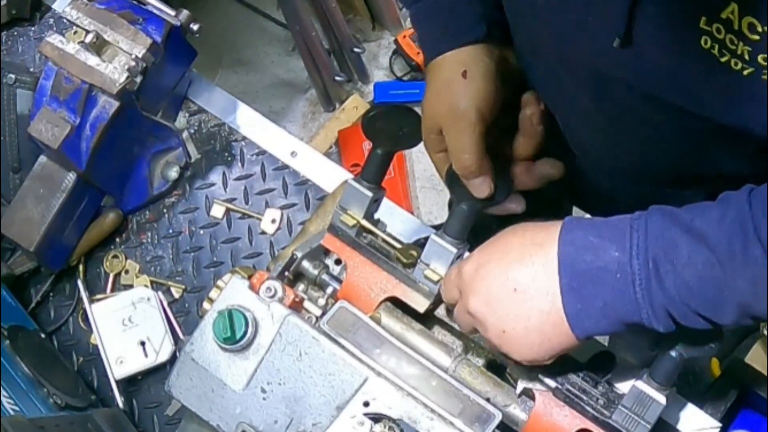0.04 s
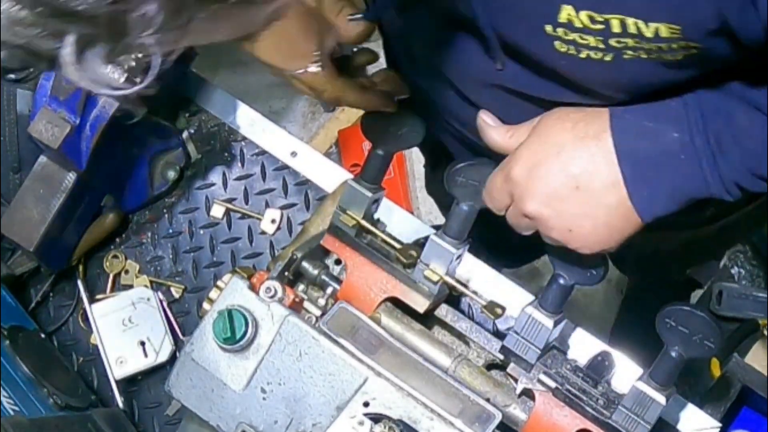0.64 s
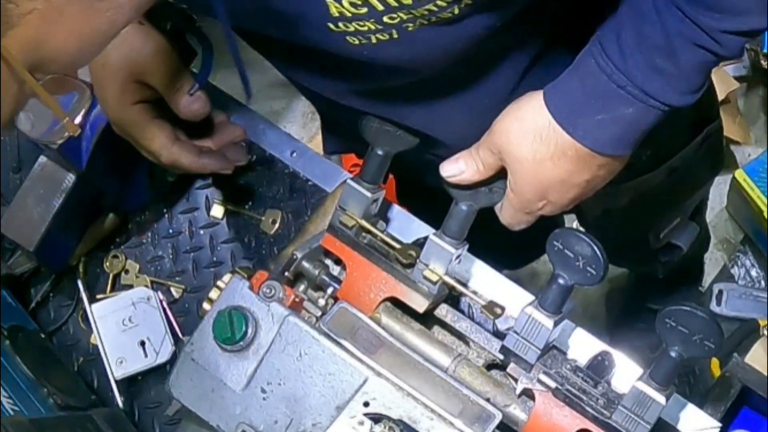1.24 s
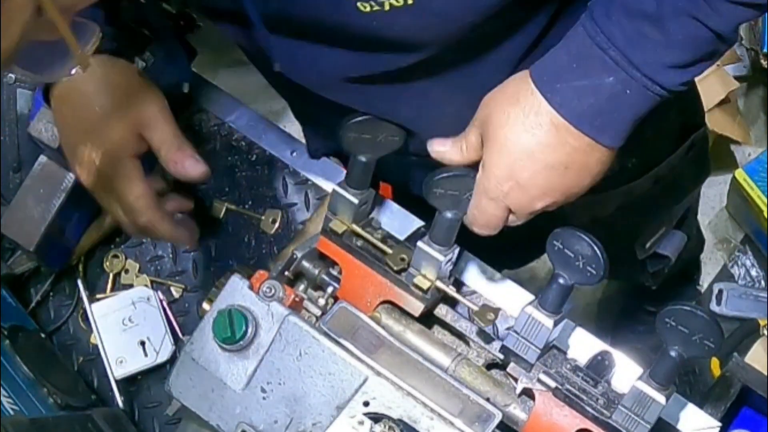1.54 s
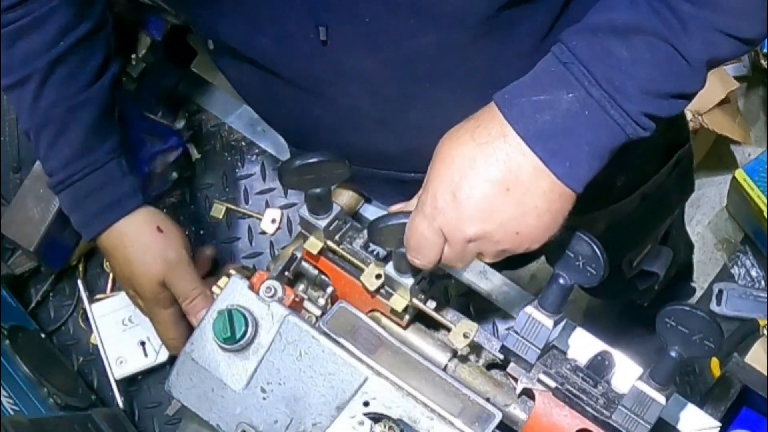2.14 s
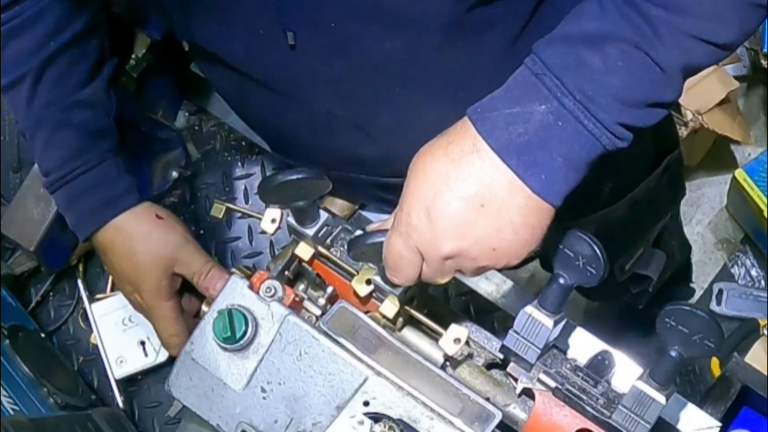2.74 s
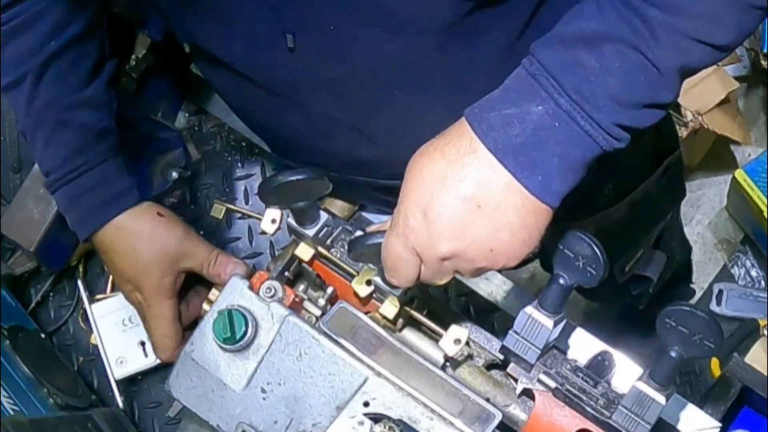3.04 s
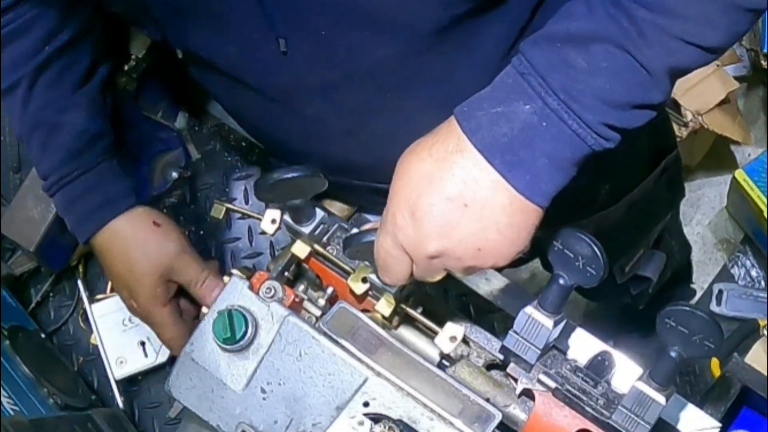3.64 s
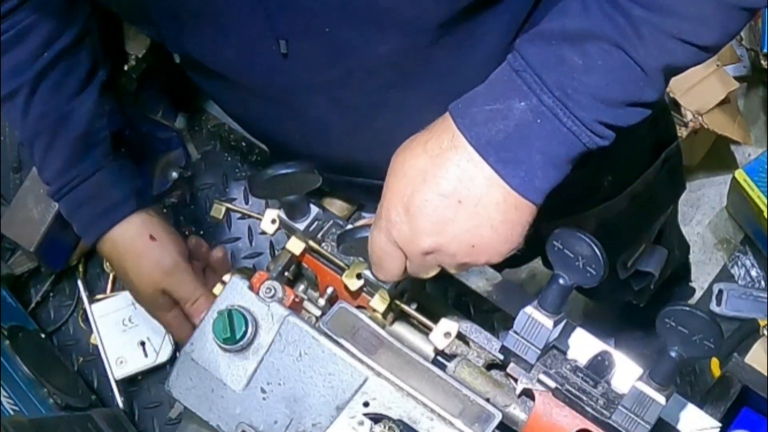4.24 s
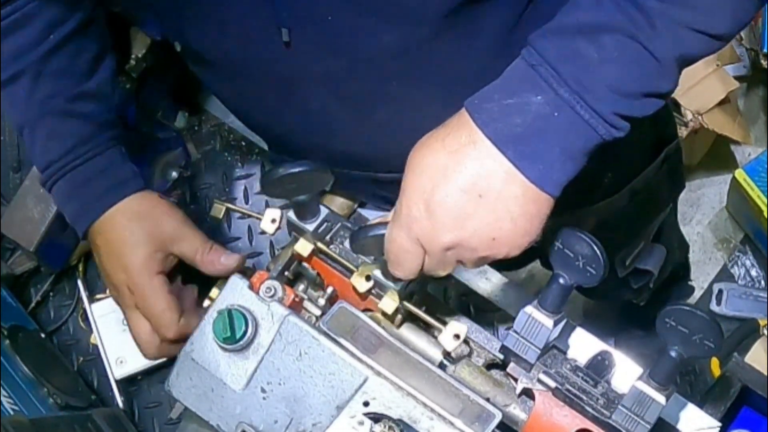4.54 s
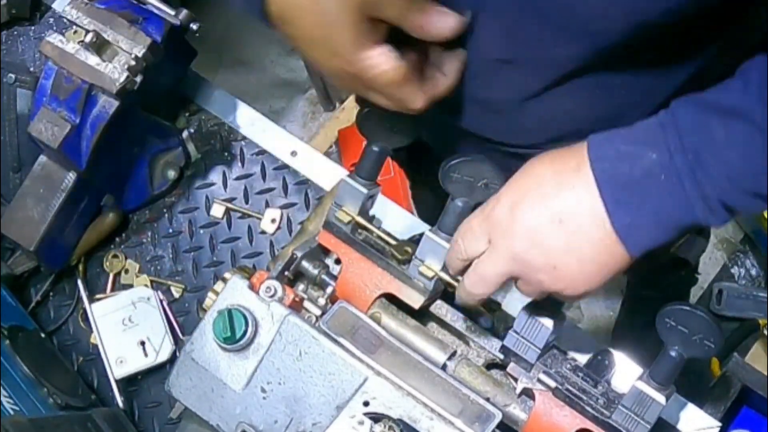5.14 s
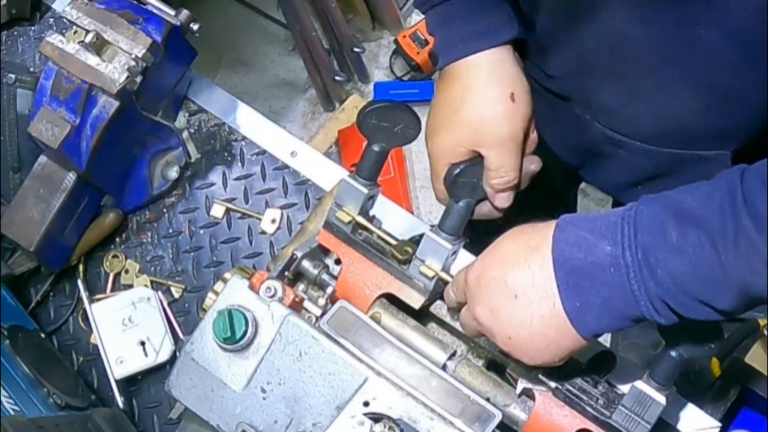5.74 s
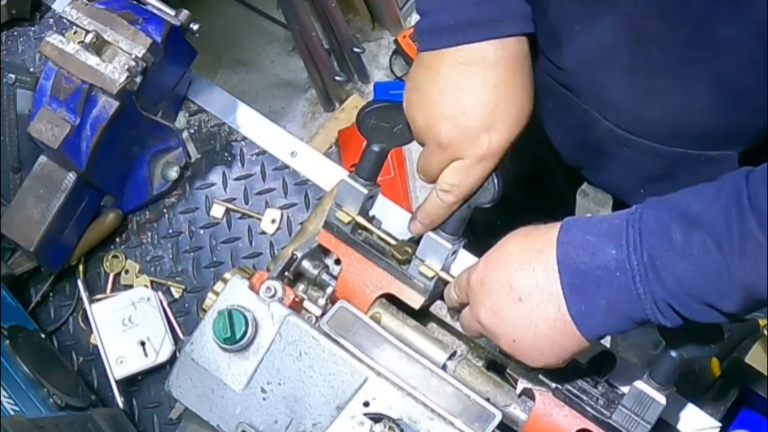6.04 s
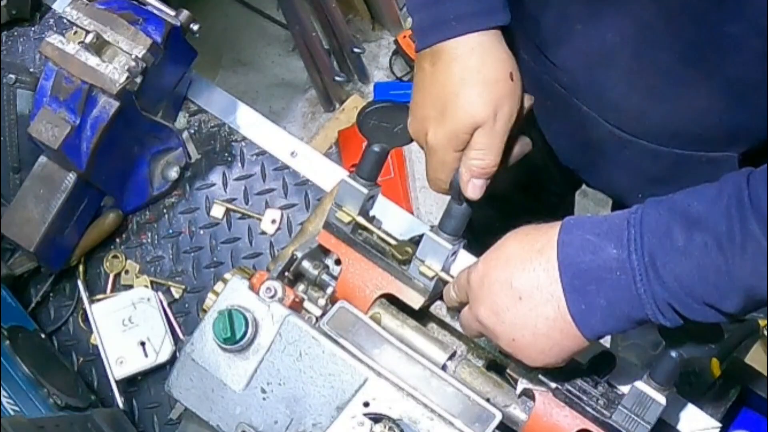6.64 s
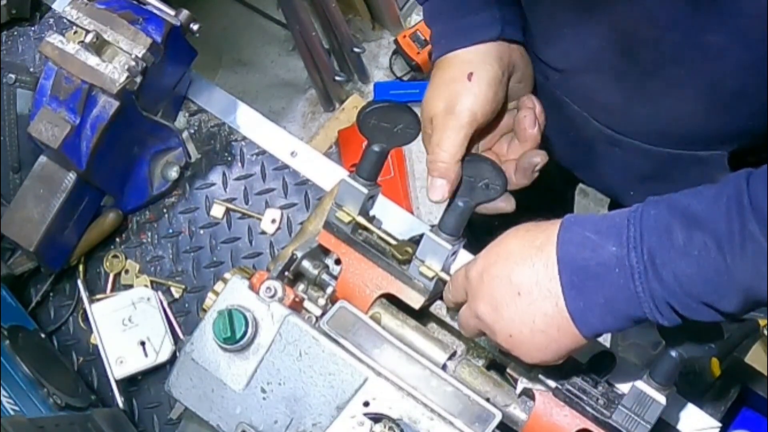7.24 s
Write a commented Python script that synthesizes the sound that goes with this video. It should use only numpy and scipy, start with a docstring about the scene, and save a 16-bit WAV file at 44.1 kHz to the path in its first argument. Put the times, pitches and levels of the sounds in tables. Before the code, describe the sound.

The electric motor of a key-cutting machine hums and throbs steadily while its carriage is shifted with faint knocks and light ticks.

```python
"""A key-cutting machine idles close by. Its motor throbs and hums, and drives the frame, the housing
and a loose panel into forced vibration. The cutter spindle rings faintly; the bearings hiss, whistle
and rub once every turn, over cooling air and workshop rumble. Hands shift the key carriage, whose
impacts give a few dull knocks and light ticks; the hum sinks while they press."""
import sys
import numpy as np
from scipy.fft import rfft, irfft, next_fast_len
from scipy.io import wavfile
from scipy.ndimage import map_coordinates

SR = 44100
rng = np.random.default_rng(int(sys.argv[2]) if len(sys.argv) > 2 else 0)


def inscribe(sig):
    """Save sig as 16-bit PCM at rate SR to the path in sys.argv[1].

    A 1-D sig is mono; a 2-D sig holds one channel per row.
    Samples are clipped to [-1, 1] before scaling.
    """
    pcm = np.round(np.clip(np.atleast_2d(sig).T, -1, 1) * 32767)
    wavfile.write(sys.argv[1], SR, pcm.astype(np.int16))


N = 321489

SHAFT_HZ, THROB_HZ = 24.897, 25.002
SWELL_S = 0.22  # time for a resonance to build up or die down
# resonances of the cast frame: f/Hz, width/Hz, level/dB
FRAME_MODES = [(163.2, 24.6, 1), (198.8, 39.5, 2), (258.5, 19, -5), (281.5, 41, -1), (348.5, 113, -10.5),
               (412, 58, -11.5)]
# resonances of the sheet-metal housing: f/Hz, width/Hz, level/dB
HOUSING_MODES = [(507, 56, 1), (647, 220, -8.5), (758, 340, -3.5), (1326, 128, -2), (1430, 225, -5.5),
                 (1657, 177, -8)]


def amp(db):
    """Amplitude ratio of a level in decibels."""
    return 10 ** (np.asarray(db) / 20)


def unit(x):
    """Normalisation to rms 1."""
    return x / np.sqrt(np.mean(x ** 2) + 1e-20)


def clock():
    """Uniform sampling: t/s of each sample."""
    return np.arange(N) / SR


def wobble(rate):
    """Slow random modulation: a spline through `rate` knots a second."""
    t = np.linspace(0, N / SR, num=4000)
    curve = map_coordinates(rng.standard_normal(size=400), [t * rate], mode="wrap")
    return np.interp(clock(), t, curve)


def spells(rows, rise=SWELL_S, fall=SWELL_S):
    """Trapezoidal envelopes, summed over rows of t/s, length/s, height."""
    t = clock()
    return sum(height * np.clip((t - start) / rise, 0, 1) * np.clip(1 - (t - start - length) / fall, 0, 1)
               for start, length, height in rows)


def filtered(x, response):
    """Linear filtering: the spectrum of x times a frequency response."""
    size = next_fast_len(N + SR // 4)
    return irfft(rfft(x, size) * response(np.fft.rfftfreq(size, 1 / SR)), size)[:N]


def rush(spectrum):
    """Coloured noise, rms 1, from rows of f/Hz, level/dB."""
    hz, db = np.transpose(spectrum)
    noise = rng.standard_normal(N)
    return unit(filtered(noise, lambda f: amp(np.interp(np.log(f + 1), np.log(hz), db))))


def shaft_comb(hz, repeat):
    """Comb filtering: surfaces that meet again each turn favour the shaft's harmonics."""
    return (1 + repeat ** 2 - 2 * repeat * np.cos(2 * np.pi * hz / SHAFT_HZ)) ** -.5


def shaken(modes, repeat=0):
    """Forced vibration, rms 1: noise through a body's steep-sided resonances."""
    def response(f):
        power = sum(amp(db) ** 2 / (1 + ((f * f - hz * hz) / (f * width + 1e-6)) ** 2) ** 2
                    for hz, width, db in modes)
        return np.sqrt(power) * shaft_comb(f, repeat)
    return unit(filtered(rng.standard_normal(N), response))


def tone(hz, waver):
    """Phase modulation: a sine of rms 1 that strays by about `waver` radians."""
    return np.sqrt(2) * np.sin(2 * np.pi * (hz * clock() + rng.random()) + waver * wobble(7))


def throb(order, lag=0.368):
    """One Fourier component of the motor's pulse, rms 1, delayed by `lag` throb cycles."""
    return np.sqrt(2) * np.sin(2 * np.pi * order * (lag - THROB_HZ * clock()))


def rolling(turn, noise, repeat):
    """Periodic roughness: a share `repeat` of the noise power recurs with every turn."""
    surface = map_coordinates(noise, [SR + (turn % 1) * (SR / SHAFT_HZ)])
    return np.sqrt(repeat) * unit(surface) + np.sqrt(1 - repeat) * noise


def around(turn, place):
    """Angular distance from a place on the shaft, in turns."""
    return abs((turn - place + .5) % 1 - .5)


def singing(modes):
    """Frequency locking, rms 1: each mode wavers on the nearest harmonic of the shaft."""
    return unit(sum(amp(db + 3.2 * wobble(2.2)) * tone(round(hz / SHAFT_HZ) * SHAFT_HZ, waver=0.9)
                    for hz, db in modes))


def struck(vibration, start, t60, rise_share):
    """Damped response to a contact, about rms 1 at its peak; the rise takes a share of t60."""
    age = np.arange(SR // 2) / SR
    shape = (1 - np.exp(-age / (rise_share * t60))) * np.exp(-np.log(1000) * age / t60)
    envelope = np.pad(shape / shape.max(), (round(start * SR), N))[:N]
    burst = vibration * envelope
    return burst * np.linalg.norm(envelope) / (np.linalg.norm(burst) + 1e-20)


def motor_hum():
    """Harmonic series on half the mains frequency; a pressing hand damps the hum and its octave."""
    # low hum: multiple of the throb, rms level/dB
    harmonics = [(2, -41), (3, -34), (5, -46), (6, -56.5), (7, -55), (9, -53), (12, -54.5)]
    # a hand bears on the machine: t/s, length/s, depth/dB
    presses = [(0, 0.26, 1.5), (1.5, 3.1, 0.5), (2.1, .85, 1.5), (2.9, 1.68, 6.5), (5.82, 0.1, 6),
               (6.55, 0.31, 5.5), (7.02, .3, 5)]
    # the hum's octave sinks: t/s, length/s, depth/dB
    octave_dips = [(.6, 0.91, 0), (1.45, 0.27, 5), (3.0, 1.55, 4)]
    press_s, release_s, mains_lag = 0.082, 0.15, 0.3367
    rocking = amp(-20) * throb(order=1, lag=0.678)
    low = sum(amp(db) * throb(order) for order, db in harmonics)
    mains_hum = amp(-28 - spells(presses, press_s, release_s)) * throb(order=4, lag=mains_lag)
    octave = amp(-35.5 - spells(octave_dips, press_s, release_s)) * throb(order=8, lag=mains_lag)
    return rocking + low + mains_hum + octave


def gear_whine():
    """Line spectrum of the running gear, lightly modulated in amplitude and phase."""
    # thin steady tones: f/Hz, rms level/dB
    partials = [(293.7, -44), (423.3, -56.5), (473.6, -60.5), (573.1, -61), (624.5, -68.5), (673.5, -62.5),
                (924.9, -70.5), (1100.1, -62.5), (1124.3, -68), (1421.4, -69), (2340.6, -75), (4107, -79)]
    return sum(amp(db + 1.72 * wobble(5)) * tone(hz, waver=0.61) for hz, db in partials)


def casing_rumble():
    """Forced vibration: the motor makes the frame rumble and the housing rattle."""
    # the rumble shifts in level: t/s, length/s, change/dB
    shifts = [(0, 0.49, -1), (5.5, 1.5, 0)]
    frame = amp(-37.5 + spells(shifts) + 1.6 * wobble(17)) * shaken(FRAME_MODES, repeat=0.1)
    housing = amp(-49.5 + 0.49 * wobble(30)) * shaken(HOUSING_MODES, repeat=0.18)
    return frame + housing


def spindle_ring(turn):
    """Narrow resonance: the cutter spindle's ring swells once a turn, above a fainter lower note."""
    # spindle resonance: f/Hz, width/Hz, level/dB
    modes = [(2050, 61, 0)]
    # the ring grows louder: t/s, length/s, lift/dB
    ring_lifts = [(0, 0.24, 3.5), (.7, .8, 2.5), (1.55, 2.7, 4.5), (2.1, 0.3, 3.5), (3.3, 1, 2.5),
                  (4.5, .5, 4), (5.42, 0.43, 7.5), (6.0, 0.74, 2.5), (6.85, .45, 5)]
    # the lower note comes forward: t/s, length/s, lift/dB
    lower_lifts = [(5.45, 0.31, 14), (6.85, .45, 18)]
    fade_s = 0.25
    ring_db = -62.5 + spells(ring_lifts, fall=fade_s) + 0.42 * wobble(4.03)
    swell_db = 0.85 * np.cos(2 * np.pi * (turn - .42))
    ring = shaken(modes, repeat=0.15) + amp(-4.5) * tone(hz=2033, waver=0.91)
    lower_note = amp(-79 + spells(lower_lifts, fall=fade_s)) * tone(hz=1890, waver=1.4)
    return amp(ring_db + swell_db) * ring + lower_note


def panel_drone():
    """Plate resonance: a loose panel drones, and one or another of its notes comes forward."""
    # broad panel resonance: f/Hz, width/Hz, level/dB
    modes = [(630, 100, 0)]
    # passing notes: t/s, length/s, f/Hz, rms level/dB
    notes = [(.85, 1.6, 632, -53.5), (1.75, 2.0, 656.5, -54), (4.4, 0.91, 640, -57), (5.75, 1.8, 578, -61)]
    note_width_hz = 19
    drone = amp(-54.5) * shaken(modes, repeat=0.53)
    for start, length, hz, db in notes:
        envelope = spells([(start, length, 1)])
        drone += amp(db) * envelope * shaken([(hz, note_width_hz, 0)], repeat=0.31)
    return drone


def bearings(turn):
    """Amplitude modulation: the treble flutters as balls roll through the load; the race rings evenly."""
    # rolling hiss: f/Hz, spectral level/dB
    hiss_spectrum = [(2500, -18), (4100, -9), (5500, 2), (6600, -8), (7600, 0), (8400, 3), (8800, 1),
                     (10000, -18), (15000, -41)]
    # resonances of the race: f/Hz, width/Hz, level/dB
    race_modes = [(2750, 40, -9), (2810, 95, 4.5), (3210, 140, 1), (3480, 43, 5.5), (3864, 140, 3.5),
                  (4120, 70, 3.5), (4250, 180, 3.5), (5110, 55, 2.5)]
    # modes of the cage: f/Hz, level/dB
    cage_modes = [(6546, 1.5), (6772, -3), (6946, -5), (7195, -4), (7270, -6), (7544, 3), (7718, -1.5)]
    # the cage chatters louder: t/s, length/s, lift/dB
    cage_lifts = [(.7, 0.31, 1.5), (5.55, 0.64, 1.5)]
    # modes of the thin whistle: f/Hz, level/dB
    whistle_modes = [(8190, 1.5), (8316, -3), (8170, -4), (8000, -3.5), (7942, -3)]
    # the whistle grows louder: t/s, length/s, lift/dB
    whistle_lifts = [(0, 0.7, 3.5), (3.65, 0.6, 1), (5.5, 1.2, 1.5), (5.52, 0.17, 4), (6.25, 1.1, 0)]
    # sizzle of the loaded balls: f/Hz, width/Hz, level/dB
    sizzle_band = [(12430, 450, 0)]
    balls, ball_swing_db, zone_turns = 7, 2, 0.24
    load_zone = np.exp(-(around(turn, place=0.58) / zone_turns) ** 3)
    ball_pass = amp(ball_swing_db * np.cos(2 * np.pi * balls * (turn - 0.485)))
    load = unit(load_zone * ball_pass)
    hiss = amp(-68.5 + 0.31 * wobble(2.3)) * rolling(turn, rush(hiss_spectrum), repeat=0.77)
    race = amp(-62) * shaken(race_modes, repeat=0.55)
    cage = amp(-66 + spells(cage_lifts)) * singing(cage_modes)
    whistle = amp(-67.5 + spells(whistle_lifts)) * singing(whistle_modes)
    sizzle = amp(-80) * shaken(sizzle_band)
    return race + load * (hiss + cage + whistle + sizzle)


def dry_rub(turn):
    """Friction noise: each dry spot of the bearing fizzes as it passes, once a turn."""
    # dry spots: place/turns, width/turns, level/dB
    spots = [(.12, 0.03, 5), (.345, 0.022, 10), (.54, 0.033, 2.5), (.885, 0.012, 12), (.927, 0.016, 11),
             (.97, 0.014, 10)]
    # their fizz: f/Hz, spectral level/dB
    spectrum = [(3000, -24), (6000, -2), (7400, 0), (8300, -1), (9600, -4.5), (11000, -16), (12450, -5),
                (13300, -12), (14300, -7.5), (15200, -19)]
    contact = sum(amp(db) * np.exp(-.5 * (around(turn, place) / width) ** 2)
                  for place, width, db in spots)
    return amp(-66.5) * unit(contact * rolling(turn, rush(spectrum), repeat=0.92))


def cooling_air(turn):
    """Broadband flow noise, a small part of which repeats with the shaft."""
    # rush of air: f/Hz, spectral level/dB
    spectrum = [(1290, -64), (2200, -3), (2680, -3.5), (3360, 3.5), (3650, -3), (4190, 0), (4590, -1),
                (5020, 0), (6050, -1.5), (7400, -1.5), (8400, -4), (9880, -12.5), (10600, -19.5),
                (12600, -16.5), (14600, -26), (15500, -36)]
    return amp(-56.5) * rolling(turn, rush(spectrum), repeat=0.16)


def workshop_rumble():
    """Stationary ambient noise, strongest in the bass."""
    # room noise: f/Hz, spectral level/dB
    spectrum = [(15, -11), (45, -3.5), (110, 2.5), (140, -5), (400, -16.5), (800, -28), (1100, -27),
                (1800, -25), (2300, -28.5), (3000, -36), (6000, -78)]
    return amp(-41) * rush(spectrum)


def key_ticks():
    """Impact noise: key and clamp tap and scrape in short, decaying bands of noise."""
    # contacts: t/s, level/dB, f/Hz, t60/s
    ticks = [(2.572, -53, 1700, .05), (2.862, -51, 1940, 0.2), (2.872, -48, 1260, 0.26),
             (2.877, -36, 357, 0.19), (2.89, -45, 805, 0.24), (2.956, -47.5, 1390, 0.17),
             (3.385, -47, 1400, 0.048), (4.066, -48, 1900, 0.075), (4.282, -35.5, 750, 0.043),
             (4.281, -32, 500, 0.033), (4.292, -36, 410, 0.091), (5.086, -51, 3900, 0.089)]
    relative_width = 0.36
    return sum(amp(db) * struck(shaken([(hz, relative_width * hz, 0)]), start, t60, rise_share=0.038)
               for start, db, hz, t60 in ticks)


def carriage_knocks():
    """Modal excitation: a soft bump rings the frame modes nearest its pitch and rattles the housing."""
    # bumps: t/s, frame level/dB, housing level/dB, t60/s
    bumps = [(2.822, -34, -57, 0.099), (2.858, -25, -49, 0.16), (2.885, -23.5, -50, 0.3),
             (2.959, -26, -49, 0.185), (3.306, -30, -63, 0.11), (4.290, -25, -47.5, 0.075),
             (4.35, -25.5, -49, 0.081), (4.579, -24.5, -46, 0.088), (4.623, -31, -61, 0.096),
             (5.104, -32, -60, .07), (6.57, -31.5, -62, 0.13)]
    bump_hz, fall_db_per_octave, rise_share = 226, 33, 0.048
    ring = unit(sum(amp(db - fall_db_per_octave * abs(np.log2(hz / bump_hz))) * tone(hz, waver=1.48)
                    for hz, _, db in FRAME_MODES))
    rattle = shaken(HOUSING_MODES)
    knocks = np.zeros(N)
    for start, frame_db, housing_db, t60 in bumps:
        knocks += amp(frame_db) * struck(ring, start, t60, rise_share)
        knocks += amp(housing_db) * struck(rattle, start, t60, rise_share)
    return knocks


def scene():
    """Superposition of machine, room and handling in one channel."""
    turn = SHAFT_HZ * clock()
    machine = motor_hum() + gear_whine() + casing_rumble() + spindle_ring(turn) + panel_drone()
    machine += bearings(turn) + dry_rub(turn) + cooling_air(turn)
    return (machine + workshop_rumble() + key_ticks() + carriage_knocks())[None]


def record(dry):
    """Band limiting: an ideal low-pass filter removes the highest treble."""
    cutoff_hz = 15700
    return filtered(dry[0], lambda hz: hz < cutoff_hz)[None]


dry = scene()
out = record(dry)
inscribe(out)
```